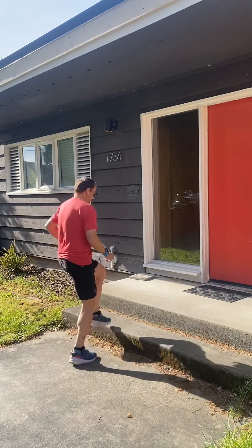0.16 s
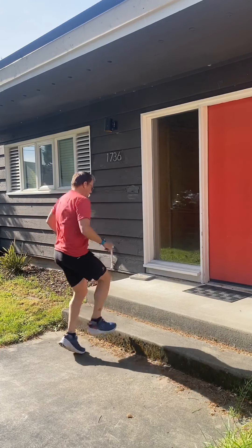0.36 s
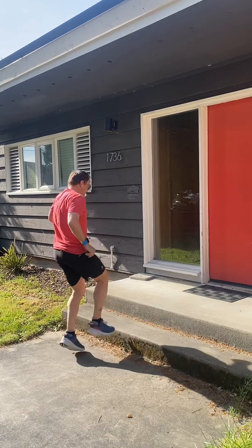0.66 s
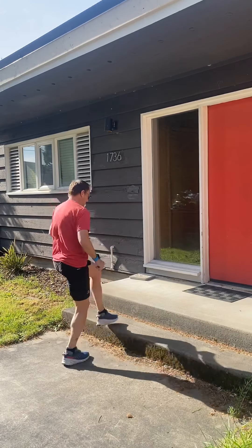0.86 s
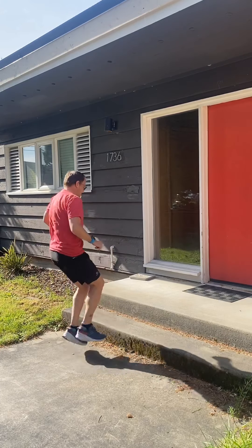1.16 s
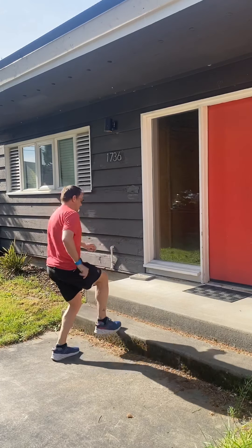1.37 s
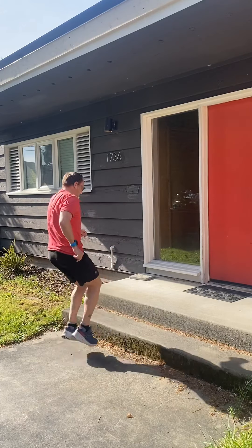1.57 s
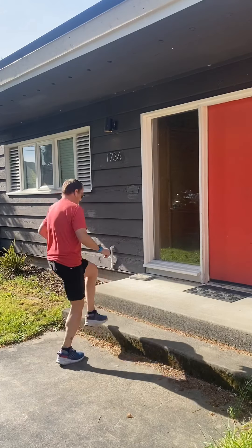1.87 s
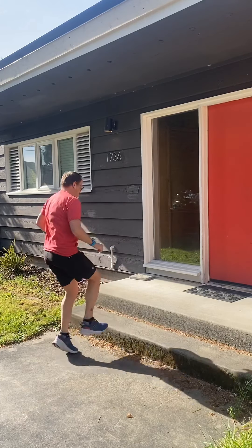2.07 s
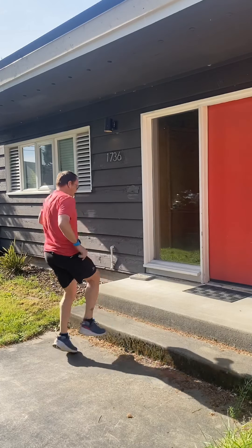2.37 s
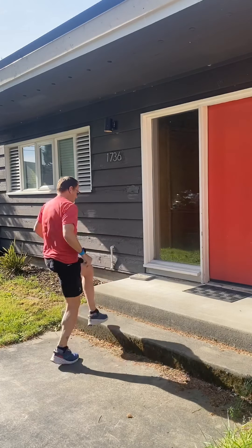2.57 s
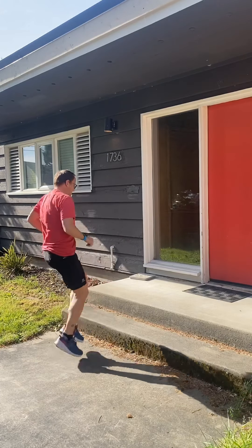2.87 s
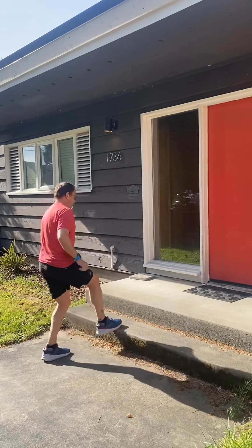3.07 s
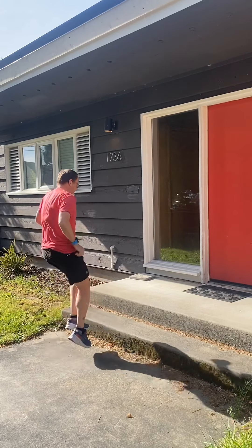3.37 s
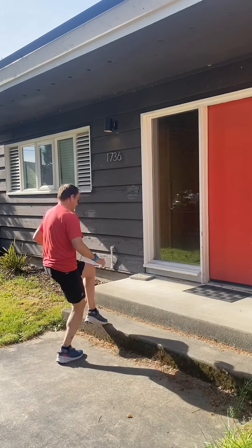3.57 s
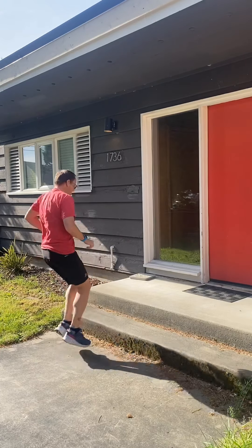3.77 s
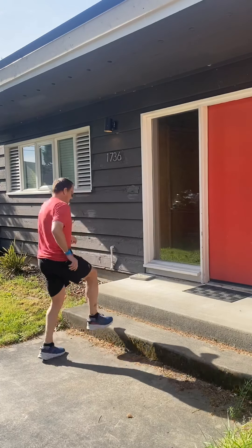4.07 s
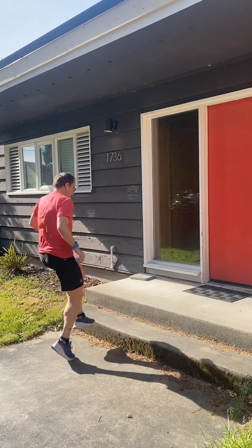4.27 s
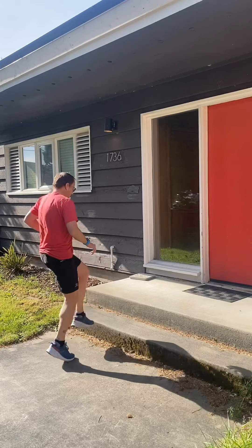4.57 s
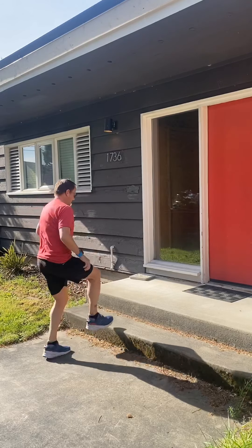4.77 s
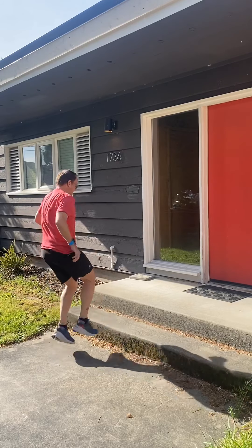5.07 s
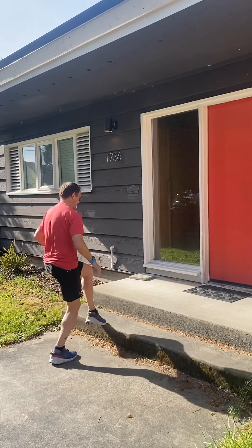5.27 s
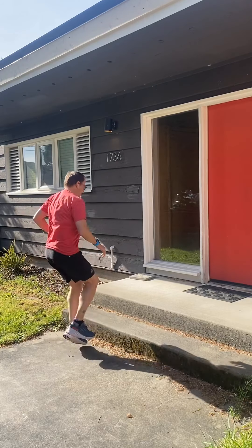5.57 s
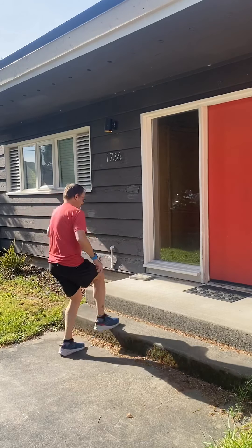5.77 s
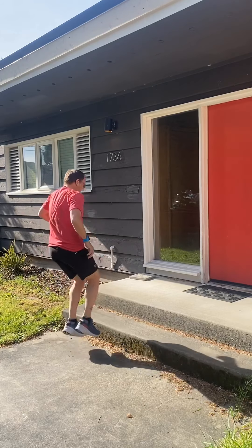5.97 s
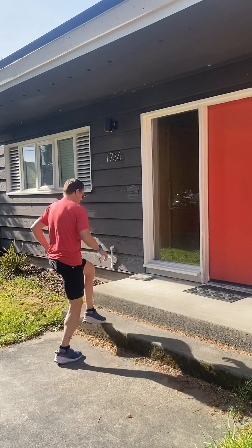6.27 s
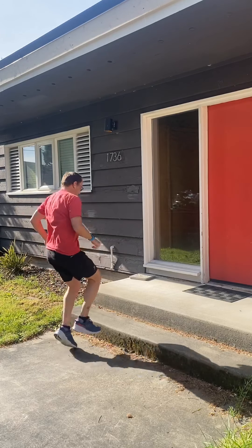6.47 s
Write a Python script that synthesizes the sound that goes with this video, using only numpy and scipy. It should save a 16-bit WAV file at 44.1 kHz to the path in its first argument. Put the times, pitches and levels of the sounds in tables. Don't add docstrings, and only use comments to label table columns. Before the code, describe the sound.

Sneakers tap quickly and alternately on a gritty concrete step, with one sharp smack, while a bird whistles and a distant engine drones over faint traffic.

```python
import sys
import numpy as np
from scipy import signal
from scipy.fft import rfft, irfft
from scipy.io import wavfile
from scipy.ndimage import uniform_filter1d

SR = 44100
rng = np.random.default_rng(int(sys.argv[2]) if len(sys.argv) > 2 else 0)


def volts(x):
    e = np.asarray(x, float) / 20
    return 10 ** e


def store_pcm(level_fs):
    pcm = np.round(np.clip(level_fs, -1, 1) * 32767).astype(np.int16)
    wavfile.write(sys.argv[1], SR, np.atleast_2d(pcm).T)


N = 292383
T = np.arange(N) / SR
FREQ = np.arange(N // 2 + 1) * SR / N

# [f/Hz, level/dB]
TOWN_TONE = [(20, -12), (34, 5), (45, -7), (68, 2.5), (130, -5.5), (250, -9), (420, -14.5), (800, -18.5),
             (1300, -28.5), (2200, -40), (3500, -46), (6000, -51.5), (8000, -39), (10500, -59.5),
             (12500, -69)]
# [t/s, level/dB]
TRAFFIC = [
    (0.0, -45),
    (1.03, -45),
    (1.7, -44.5),
    (2.73, -44),
    (3.5, -43.5),
    (5.4, -47),
    (6.63, -46),
]
# [t/s, thud level/dB, slap level/dB, grit level/dB, thud f/Hz]
LANDINGS = [(0.007, -24, -32.5, -36.5, 227), (0.431, -27.5, -33, -30.5, 240), (0.858, -22.5, -42, -39, 213),
            (1.272, -23.5, -25.5, -33, 312), (1.698, -25, -38.5, -39, 212), (2.127, -23, -28.5, -31.5, 270),
            (2.557, -26, -39.5, -35.5, 244), (2.97, -23, -33, -36.5, 387), (3.448, -26, -36.5, -35, 214),
            (3.86, -25.5, -34, -31.5, 347), (4.302, -23, -79, -43, 239.5), (4.732, -18, -29, -32.5, 402),
            (5.199, -23.5, -34, -38, 250.7), (5.625, -24, -27.5, -32.5, 265),
            (6.095, -20.5, -35, -32.5, 224), (6.517, -25.5, -26.5, -34, 250)]
# [t/s, thud level/dB, slap level/dB, grit level/dB, thud f/Hz]
TAPS = [(0.08, -24.5, -30.5, -34, 267), (0.511, -23.5, -29, -29.5, 265), (0.918, -45, -44, -48, 221),
        (0.955, -26.5, -37.5, -46, 228), (1.337, -23.5, -26, -30, 447), (1.567, -61, -32.5, -37.5, 250),
        (1.785, -26, -32.5, -35.5, 233), (2.222, -25.5, -27, -40, 242), (3.105, -23, -35, -45.5, 260),
        (3.511, -28, -34.5, -55, 236), (3.953, -21, -29.5, -40, 396), (4.763, -43, -44, -49, 412),
        (4.848, -28.5, -32.5, -34, 210.8), (5.279, -30.5, -37, -54, 274), (5.747, -26.5, -27, -44, 272),
        (6.18, -26.5, -30, -39.5, 257), (6.618, -26, -39, -29.5, 454)]
# [f/Hz, level/dB, time to fall 60 dB/s]
SOLE_MODES = [(295, -5.5, 0.082), (379.6, -6.5, 0.066), (139, -10.5, 0.04)]
# [t/s, level/dB, f/Hz]
KNOCKS = [(0.078, -32, 1070), (0.432, -28, 690), (0.51, -47, 735), (0.857, -33, 964), (0.959, -35, 552),
          (1.273, -30, 552), (1.339, -31, 552), (1.569, -23, 770), (1.699, -42, 1010), (1.782, -43, 1113),
          (2.127, -21, 715), (2.223, -34, 1030), (2.555, -48, 571), (2.97, -29, 540), (3.102, -32, 923),
          (3.447, -33, 950), (3.509, -46, 977), (3.861, -25, 660), (3.952, -43, 960), (4.303, -31, 670),
          (4.731, -20.5, 680), (4.854, -33, 587), (5.2, -32, 789), (5.279, -36, 674), (5.624, -43, 700),
          (5.745, -32, 670), (6.095, -29.5, 970), (6.178, -44, 1082), (6.52, -18, 733), (6.55, -36, 712),
          (6.618, -42, 555)]
# [t/s, grit level/dB, rasp level/dB, fall/ms]
DRAGS = [(0.16, -46, -46, 11), (0.587, -66, -36, 16), (0.9857, -67, -52, 14), (1.002, -34.5, -30.5, 17),
         (1.0414, -55, -38, 8.9), (1.1523, -51, -42, 3.4), (1.361, -63, -44, 56), (1.4216, -65, -44, 11),
         (1.856, -47.5, -43.5, 15.5), (2.2618, -41, -38, 10.5), (2.2997, -49, -35, 6.2),
         (2.7055, -36, -34.5, 28.6), (3.0237, -56, -47, 14), (3.1806, -54, -36, 2.8),
         (3.551, -47, -40, 4.8), (3.586, -59, -56, 12), (3.917, -54, -52, 10), (4.032, -54, -45, 5.9),
         (4.384, -42.5, -39, 6.3), (4.428, -59, -54, 41), (4.787, -56, -60, 21), (4.922, -45.5, -35, 3.1),
         (5.363, -51, -47, 19), (5.651, -57, -55, 11), (5.6976, -38, -46, 6.3), (5.815, -44, -38, 8.1),
         (6.286, -61, -49.5, 12), (6.543, -70, -45, 8.5)]
# [t/s, grit level/dB, rasp level/dB, fall/ms]
PUSH_OFFS = [(0.28, -44.5, -37, 15), (0.703, -42, -36.5, 12), (1.122, -53, -40, 17),
             (1.983, -55, -43.5, 17), (2.408, -48.5, -35, 17.4), (2.841, -47.5, -37.5, 28.5),
             (3.284, -45.5, -35.5, 13), (3.72, -52, -37, 14), (4.158, -45.5, -37, 10.8),
             (4.584, -46.5, -38.5, 21.6), (5.0435, -42.5, -34, 16.5), (5.487, -54, -45.5, 27),
             (5.931, -44, -31.5, 11.7), (6.37, -54.5, -42.5, 21)]
# [peak t/s, grit level/dB, rasp level/dB, rise/ms, fall/ms]
SLIDE = [
    (1.344, -50, -43, 64, 11),
    (1.312, -48, -29, 22, 3),
]
# [t/s, level/dB, body level/dB]
TICKS = [(0.112, -37, -58), (0.5889, -23.5, -27.5), (0.814, -44, -47), (0.8843, -45, -37),
         (1.362, -27.5, -50), (1.462, -59, -41.5), (1.58, -49, -46), (1.7856, -51, -34), (1.85, -38, -41),
         (2.258, -30, -53), (2.301, -21.5, -30.5), (2.6741, -40.5, -38), (2.701, -34, -41),
         (2.7182, -29, -36), (2.744, -23.5, -62), (3.063, -38.5, -44), (3.293, -47, -41), (3.527, -41, -54),
         (3.591, -39, -49), (3.605, -43, -61), (3.922, -40, -55), (4.3264, -41.5, -44), (4.403, -31.5, -57),
         (4.461, -44, -39.5), (4.472, -28.5, -40), (5.655, -27.5, -42), (5.8641, -48, -48)]
# [t/s, depth/dB]
LULLS = [(.38, 4), (.8, 3), (1.23, 7), (1.52, 8), (1.66, -3), (1.935, 16), (2.08, 10), (2.5, -8),
         (2.92, -3), (3.24, 5), (3.42, -5), (3.68, 16), (3.82, 3), (4.1, 14), (4.26, -3), (4.69, 10),
         (5.0, 15), (6.06, -3), (6.45, 12)]
# [f/Hz, level/dB]
RASP_TONE = [(500, 2), (900, 3.5), (1400, 2), (1900, -1), (2400, -1), (2850, 0), (3300, -12), (4000, -22.5),
             (5000, -44)]
# [f/Hz, level/dB]
GRIT_TONE = [(1500, 4.5), (3000, 2.5), (4000, -4), (5500, 5.5), (8000, 8.5), (10000, -5), (11500, -16.5),
             (12500, -17), (14000, -28)]
# [t/s, level/dB, high ring minus low ring/dB]
CRACKS = [(0.2626, -31.5, 6), (0.4428, -40, -4), (0.9836, -35, 2), (1.0048, -22.5, -5), (1.2726, -21, -8),
          (1.4244, -28, 5), (1.7005, -38, 9), (1.786, -32, 19), (2.13, -31, 8), (2.133, -27.5, 14),
          (2.221, -35, 0), (2.3004, -29, 9), (2.554, -36, 9), (2.7037, -35, 4), (2.718, -17, -6),
          (2.7404, -29, -8), (2.966, -38, -9), (3.187, -37.5, 0), (3.2915, -31.5, -20), (3.447, -29, 11),
          (3.511, -32, -7), (3.557, -31.5, -2), (3.5917, -37, -3), (3.605, -36.5, 11), (3.7244, -54, -9),
          (3.7336, -40.5, -13), (3.864, -20.5, -4), (3.9536, -33.5, -24), (4.3883, -27.5, -7),
          (4.4709, -26, -4), (4.7334, -26, 0), (4.8279, -44, 1), (5.0542, -30, -11), (5.197, -33, 2),
          (5.622, -32, -5), (5.649, -34, -5), (5.9016, -38, -5), (6.093, -38, -1), (6.6015, -34.5, 0)]
# [f/Hz, level/dB, time to fall 60 dB/s]
CRACK_LOW = [(5340, 0.5, 0.005), (3030, -10, 0.0067)]
# [f/Hz, level/dB, time to fall 60 dB/s]
CRACK_HIGH = [(8450, 1.5, 0.0067), (9870, -11.5, 0.004)]
# [t/s, level/dB]
SNAPS = [(0.4928, -79), (0.5911, -61), (0.9852, -64), (1.1318, -79), (1.1428, -79), (1.2785, -60),
         (1.3162, -33), (1.4306, -73), (1.4306, -68), (1.5698, -67), (1.786, -62), (2.135, -83),
         (2.135, -80), (2.2199, -76), (2.2578, -58), (2.3002, -68), (2.5576, -63), (2.7013, -80),
         (2.7023, -63), (2.7172, -53), (2.9706, -69), (3.1043, -72), (3.445, -71), (3.6017, -83),
         (3.8646, -59), (4.2999, -71), (4.3271, -69), (4.4697, -73), (4.4722, -67), (4.7316, -69),
         (4.8404, -77), (4.9252, -78), (5.0464, -73), (5.1966, -64), (5.6236, -73), (5.648, -59),
         (5.6974, -70), (5.6994, -64), (5.747, -71), (5.8157, -73), (5.9333, -91), (5.9329, -71),
         (6.0932, -71), (6.1823, -87)]
# [f/Hz, level/dB]
SNAP_TONE = [(7000, -25.5), (9000, -6), (11000, -1), (12500, 2.5), (14000, -1), (15500, 1.5)]
# [t/s, f/Hz, level/dB]
DRONE = [
    (0.95, 139, -45.5),
    (1.27, 139, -42.5),
    (1.7, 140.8, -46.5),
    (1.88, 143, -41),
    (2.89, 144.2, -40),
    (3.15, 137.6, -47.5),
    (3.51, 130.5, -36.5),
    (4.47, 130.9, -37.5),
    (4.55, 134, -79),
]
# [t/s, f/Hz, level/dB]
THROB = [
    (3.88, 70.3, -55),
    (4.02, 65.7, -35.5),
    (4.5, 67.4, -50),
    (4.6, 66.3, -49),
    (4.79, 68.35, -44),
    (5.27, 68.15, -44.5),
    (5.96, 67.13, -49.5),
    (6.63, 66.1, -46),
]
# [t/s, f/Hz, level/dB]
WHINES = [
    [(3.9, 253.3, -53), (4.2, 253.6, -51), (4.5, 251.5, -48.5)],
    [(3.95, 312, -51), (4.48, 310, -45)],
]
# [t after its start/s, f/Hz, level/dB]
PHRASE = [
    [(0, 4670, -5), (.004, 5590, -1.5), (.008, 6120, -2), (.014, 6280, -1), (.024, 6340, -4)],
    [(.036, 6900, -10), (.043, 6400, -4), (.051, 5750, -7), (.062, 6200, -12)],
    [(.076, 4760, -1), (.081, 5540, -23)],
    [(.082, 5240, -14), (.090, 4500, -13), (.099, 4170, -4.5), (.108, 4480, -24)],
    [(.100, 3280, -14), (.112, 3610, 1.5), (.122, 3950, -4), (.131, 4050, 0.5), (.141, 3670, -1.5),
     (.157, 3130, 0.5), (.172, 2800, -3), (.184, 2420, -11.5)],
]
# [t/s, level/dB]
SONG = [
    (-.001, -36.5),
    (.219, -36),
    (0.442, -37),
    (5.203, -37.5),
    (5.421, -37),
    (5.639, -36.5),
    (5.861, -36),
]
# [t/s, level/dB]
LEAD_IN = (4.985, -41.5)
# [t/s, f/Hz, level/dB]
WHISTLES = [
    [(4.575, 6070, -71), (4.60, 6510, -56), (4.65, 6550, -57), (4.72, 6810, -52)],
    [(4.62, 7680, -56), (4.66, 8200, -62), (4.72, 8300, -65)],
    [(4.775, 5610, -46), (4.80, 5460, -55), (4.835, 5380, -50), (4.85, 5320, -76), (4.91, 5300, -75)],
    [(4.935, 6380, -55), (4.955, 6740, -42), (4.98, 6960, -40), (5.04, 6810, -48)],
    [(1.19, 5840, -71), (1.22, 6100, -65), (1.25, 5340, -65)],
]
# [t/s, level/dB]
SMACK = [
    (1.3092, -27),
    (1.3128, -15),
    (1.3173, -2),
    (1.3224, -10),
    (1.3266, -18),
    (1.3350, -22),
]
# [f/Hz, level/dB, time to fall 60 dB/s]
SMACK_MODES = [(1390, 1.5, .014), (1620, -3, 0.014), (2020, -0.5, 0.011), (2813, -10.5, 0.037),
               (740, -9.5, 0.033), (5550, -6, .005), (8900, -11, .004), (10600, -10, .004)]
# [f/Hz, left leads/rad, left minus right/dB, likeness 0-1]
PORTS = [(0, 0, -.5, .98), (340, -.5, 5.5, .8), (460, -1.8, 2, .8), (760, -2.1, -2, .92),
         (1150, -6, -2, .5), (1580, -7.4, 5.5, .85), (2200, -9, -9, .7), (2850, -9.5, 3, .7),
         (3500, -11.8, -1, .4), (4900, -12.1, -1, .6), (7000, -9.5, 0, 1), (7550, -9.33, 0, 1),
         (10300, -6.28, 1, .98), (11100, -6.2, 2, .97), (12600, -3.6, 3, .97), (13600, -2.55, 2, .97)]


def colour(x, points):
    hz, db = np.transpose(points)
    gain = volts(np.interp(np.log(FREQ + 1), np.log(hz), db))
    y = irfft(rfft(x) * gain, N)
    return y / y.std()


def add(out, s, x):
    i = int(round(s * SR))
    x = x[max(-i, 0):N - i]
    out[max(i, 0):max(i, 0) + len(x)] += x


def ring(modes):
    t = T[:4096]
    return sum(volts(db) * np.sin(2 * np.pi * hz * t) * volts(-60 * t / max(t60, .003))
               for hz, db, t60 in modes)


def swell(rise_ms, fall_ms):
    ms, rise = 1000 * T[:8192], max(rise_ms, .2)
    rising = np.sin(np.pi / 2 * ms / rise) ** 2
    falling = np.exp(-(abs(ms - rise) / max(1.2 * fall_ms, .2)) ** 1.5)
    return np.where(ms < rise, rising, falling)


def walk(rate):
    k = int(SR / rate)
    stairs = np.repeat(rng.standard_normal(N // k + 1), k)
    smooth = uniform_filter1d(uniform_filter1d(stairs, k), k)[:N]
    return smooth / smooth.std()


def surroundings(x, echoes, t60, wet_db, bloom=0.0004):
    t = T[:20000]
    tail = rng.standard_normal((2, len(t))) * volts(-60 * t / t60) * (1 - np.exp(-t / bloom))
    tail *= volts(wet_db) / np.linalg.norm(tail[0])
    smear = rng.standard_normal(256) * np.exp(-T[:256] / 0.00085)
    tail[1, :256] += smear / np.linalg.norm(smear)
    tail[0, 0] += 1
    for s, db in echoes:
        tail[:, int(s * SR)] += volts(db)
    return signal.fftconvolve(x[None], tail, axes=1)[:, :N]


def crunch(rough_db):
    grain_size = np.minimum(rng.exponential(size=N), 6.5)
    return rng.standard_normal(N) * volts(rough_db * grain_size)


def town():
    noise = rfft([colour(rng.standard_normal(N), TOWN_TONE) for _ in range(2)])
    octave = np.log2(FREQ + 1)
    car_db = np.interp(T, *np.transpose(TRAFFIC)) + 45
    out = 0
    for centre in range(4, 15):
        band = irfft(noise * np.clip(1 - abs(octave - centre), 0, 1), N)
        car_share = np.exp(-((centre - 8) / 2.5) ** 2)
        out = out + band * volts(car_db * car_share + 1.3 * walk(4))
    return volts(-37) * out


def scrapes():
    found = []
    for table, rise_ms in ((DRAGS, 10.7), (PUSH_OFFS, 12)):
        for s, grit_db, rasp_db, fall_ms in table:
            found.append((s + 0.0085, grit_db, rasp_db, rise_ms + 0.57 * fall_ms, fall_ms))
    return found + SLIDE


def grit_and_rasp():
    grit_gate, rasp_gate, clicks, grain_bodies, stirred = np.zeros((5, N))
    for s, _, slap_db, grit_db, _ in LANDINGS + TAPS:
        add(rasp_gate, s - .0015, volts(slap_db - 0.5) * (swell(1.0, 4.0) + 0.16 * swell(8.4, 36)))
        add(grit_gate, s - .001, volts(grit_db - 2.5) * (swell(4.05, 3.5) + 0.09 * swell(23, 64)))
        add(stirred, s, volts(-57 + 0.051 * (grit_db + 28) - 60 * T[:SR] / 0.24))
    for s, grit_db, rasp_db, rise_ms, fall_ms in scrapes():
        shape = swell(rise_ms, fall_ms)
        add(grit_gate, s - rise_ms / 1000, volts(grit_db) * shape)
        add(rasp_gate, s - rise_ms / 1000, volts(rasp_db - 2.5) * shape)
        add(stirred, s, volts(grit_db - 20 - 60 * T[:SR] / 1))
    for s, db, body_db in TICKS:
        add(clicks, s, volts(db - 1.0) * swell(0.18, 1.93))
        add(grain_bodies, s, volts(body_db - 7) * swell(0.1, 13.0))
    lull_s = 0.02
    lull_db = sum(db * np.exp(-((T - s) / lull_s) ** 2) for s, db in LULLS)
    grit_gate += stirred * volts(5 * walk(25.06) - lull_db)
    fine = grit_gate * colour(crunch(3.4), GRIT_TONE)
    fine += rasp_gate * colour(crunch(3), RASP_TONE)
    fine += clicks * colour(crunch(0.93), GRIT_TONE)
    return fine + grain_bodies * colour(crunch(2.2), RASP_TONE)


def sole_thuds():
    out = np.zeros(N)
    for s, thud_db, _, _, hz in LANDINGS + TAPS:
        ripples = uniform_filter1d(rng.standard_normal(1024), size=12) * np.sqrt(12)
        force = (1 + .6 * ripples) * swell(1.7, 1.5)[:1024]
        thud = signal.fftconvolve(np.diff(force, prepend=0), ring(SOLE_MODES + [(hz, 0, .035)]))
        add(out, s + 0.002005, volts(thud_db + 4.5) * thud / abs(thud).max())
    return out


def hollow_knocks():
    out = np.zeros(N)
    side_db = -7.5
    for s, db, hz in KNOCKS:
        hollow = ring([(hz, 0, 0.048), (0.733 * hz, side_db, .025), (1.06 * hz, side_db, .02),
                       (1.24 * hz, -4, .016), (0.625 * hz, -6, .03)])
        push = (1 + rng.standard_normal(1024)) * swell(.3, .25)[:1024]
        knock = signal.fftconvolve(push, hollow)
        add(out, s + 0.00138, volts(db + 7.5) * knock / abs(knock).max())
    return out


def shoes():
    fine = surroundings(grit_and_rasp(), [(.0046, -22.5), (.0085, -15)], 0.15, -5.5)
    body = surroundings(sole_thuds() + hollow_knocks(), [(.0046, -10.5), (.0085, -10)], 0.22, -9.5)
    return body + fine


def cracks():
    out = np.zeros(N)
    detune = .06
    for s, db, high_db in CRACKS:
        low, high, late, size = rng.uniform(-0.92, 1, 4)
        low_ring = [(hz * (1 + detune * low), d - high_db / 2, t) for hz, d, t in CRACK_LOW]
        high_ring = [(hz * (1 + detune * high), d + high_db / 2, t) for hz, d, t in CRACK_HIGH]
        crack = ring(low_ring + high_ring)
        add(out, s, volts(db - 7.5) * crack)
        add(out, s + 0.0019 + .001 * late, volts(db - 8 + 3.9 * size) * crack)
    return signal.sosfilt(signal.butter(4, 11500, fs=SR, output="sos"), out)


def snaps():
    gate = np.zeros(N)
    for s, db in SNAPS:
        add(gate, s - .0003, volts(db + 16) * swell(0.43, 0.66))
    return gate * colour(rng.standard_normal(N), SNAP_TONE)


def sharp_grains():
    return surroundings(snaps() + volts(0.5) * cracks(), [(.0075, -10)], 0.1, -9.5)


def engine():
    out = 0
    for table, wobble_db in [(DRONE, 1.2), (THROB, 2)] + [(whine, 2) for whine in WHINES]:
        s, hz, db = np.transpose(table)
        pitch = np.interp(T, s, hz) * (1 + .02 * walk(12))
        phase = 2 * np.pi * np.cumsum(pitch) / SR
        ends = np.clip(np.minimum(T - s[0], s[-1] - T) / 0.017, 0, 1)
        level = ends * np.sqrt(2) * volts(np.interp(T, s, db))
        tone = volts(wobble_db * walk(7.7)) * np.sin(phase)
        octave = volts(-13.5 + 1.0 * walk(3.5)) * np.sin(2 * phase)
        out = out + level * (tone + octave)
    return np.array([out, 0 * out])


def whistle(out, start, note, gain_db):
    s, hz, db = np.transpose(note)
    t = s[0] + T[:int((s[-1] - s[0]) * SR)]
    ends = np.clip(np.minimum(t - s[0], s[-1] - t) / 0.00039, 0, 1)
    pitch = uniform_filter1d(np.interp(t, s, hz), size=160)
    tone = np.sin(2 * np.pi * np.cumsum(pitch) / SR)
    add(out, start + s[0], volts(gain_db + np.interp(t, s, db)) * ends * tone)


def add_notes(out, start, notes, gain_db):
    for note in notes:
        whistle(out, start, note, gain_db)


def bird():
    high, low = np.zeros((2, N))
    for s, db in SONG:
        add_notes(high, s, PHRASE[:-1], db)
        add_notes(low, s, PHRASE[-1:], db)
    add_notes(high, LEAD_IN[0], PHRASE[2:-1], LEAD_IN[1])
    add_notes(low, LEAD_IN[0], PHRASE[-1:], LEAD_IN[1])
    add_notes(high, 0, WHISTLES, 0)
    high = surroundings(high * volts(1.25 * walk(190)), [(.0041, -7), (.0076, -3)], 0.36, 2, bloom=0.0065)
    low = surroundings(low * volts(1.13 * walk(150)), [(.0047, -10), (.0076, 2)], 0.42, -1.9, bloom=0.0057)
    return volts(1.73 * walk(60)) * (high + low)


def smack():
    out, crack_gate = np.zeros((2, N))
    for s, db in SMACK:
        modes = [(hz, d + 0.24 * db * max(np.log2(hz / 1600), 0), t) for hz, d, t in SMACK_MODES]
        add(out, s, -volts(db - 1.2) * ring(modes))
        add(crack_gate, s - .0004, volts(3.1 * db - 4) * (swell(0.2, 0.7) + 0.13 * swell(1.2, 9)))
    out = signal.sosfilt(signal.butter(2, 790, "high", fs=SR, output="sos"), out)
    return surroundings(out + crack_gate * colour(crunch(0.58), GRIT_TONE), [], 0.12, -21)


def scene():
    return town() + shoes() + sharp_grains() + engine() + bird() + smack()


def roll_off(x):
    return signal.sosfilt(signal.butter(12, 16690, fs=SR, output="sos"), x)


def record(dry):
    hz, *columns = np.transpose(PORTS)
    lead, pan_db, like = (np.interp(FREQ, hz, c) for c in columns)
    same, other = rfft(dry) * np.sqrt([(1 + like) / 2, (1 - like) / 2])
    tilt = volts(pan_db / 2) * np.exp(1j * lead / 2)
    top = volts(np.interp(FREQ, [10500, 12400, 13600, 15000, 16300], [0, -8, 1, -7, -40]))
    ports = irfft(top * [(same + other) * tilt, (same - other) / tilt], N)
    mix = np.clip(ports, -1, 1)
    return roll_off(mix)


dry = scene()
out = record(dry)
store_pcm(out)
```